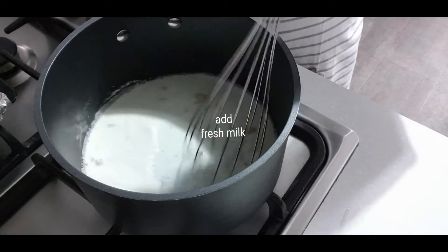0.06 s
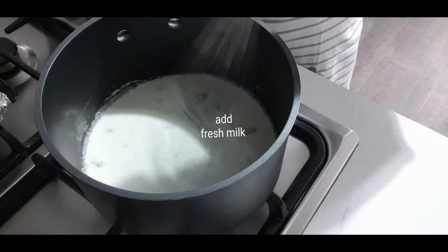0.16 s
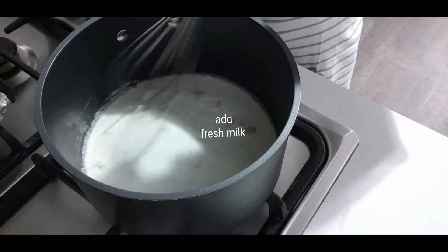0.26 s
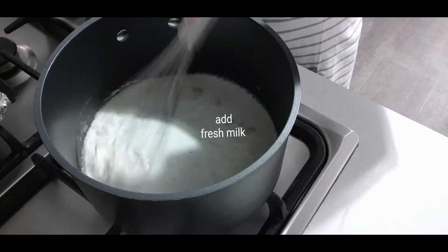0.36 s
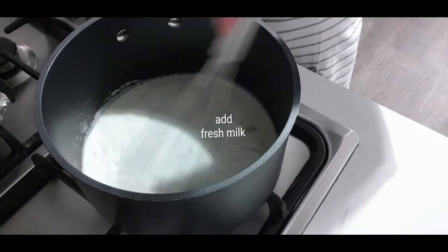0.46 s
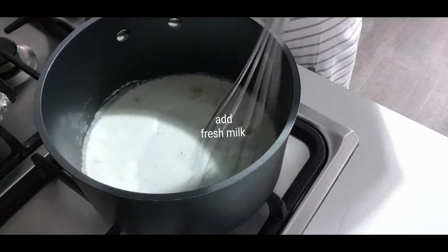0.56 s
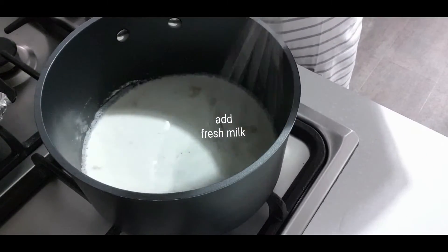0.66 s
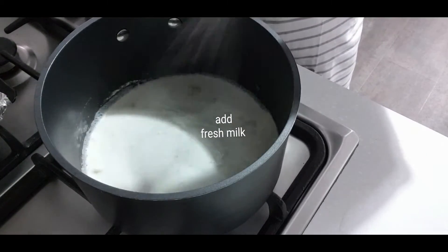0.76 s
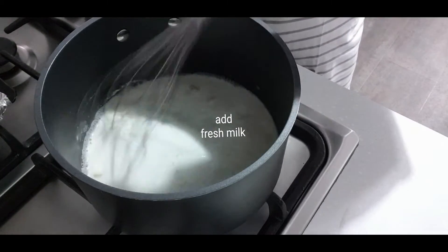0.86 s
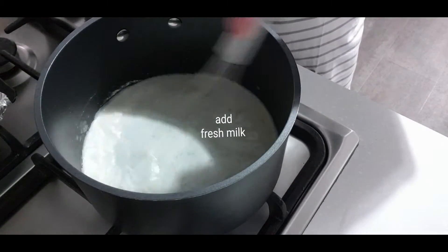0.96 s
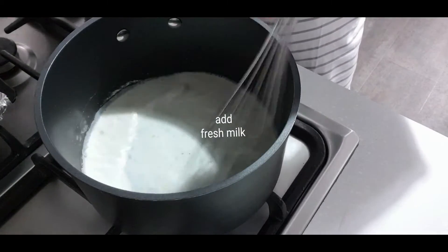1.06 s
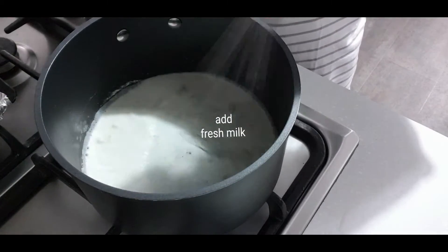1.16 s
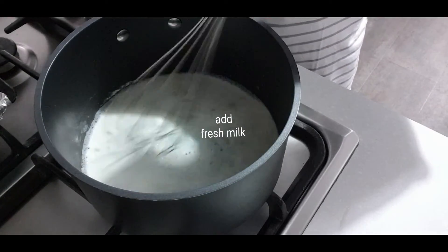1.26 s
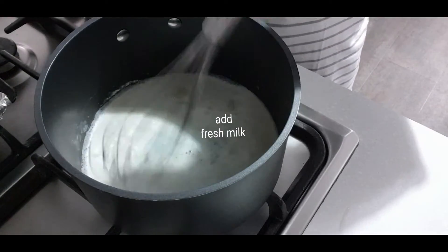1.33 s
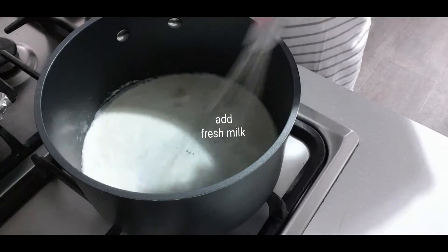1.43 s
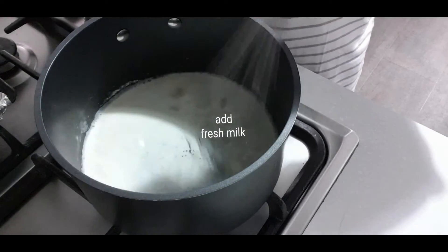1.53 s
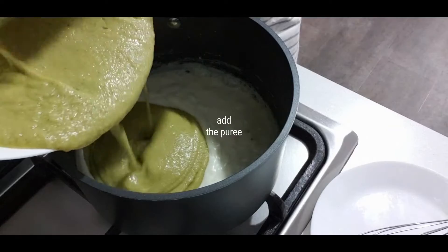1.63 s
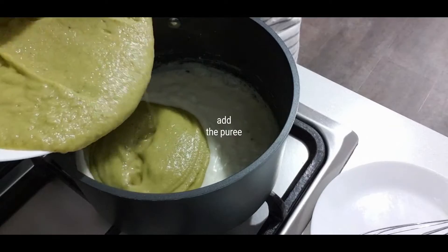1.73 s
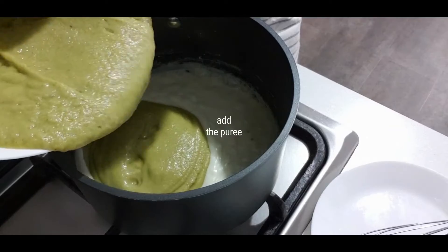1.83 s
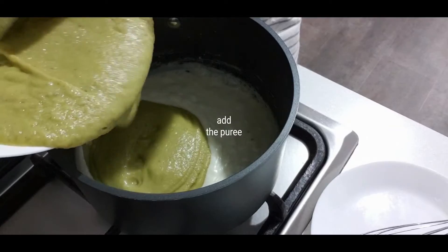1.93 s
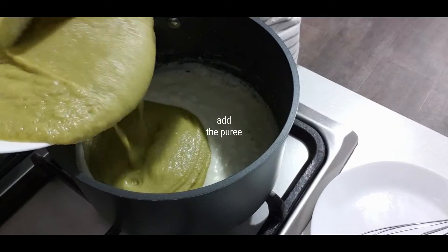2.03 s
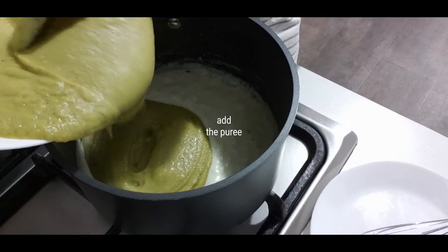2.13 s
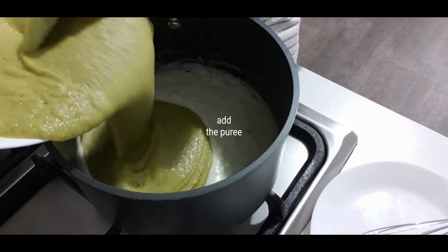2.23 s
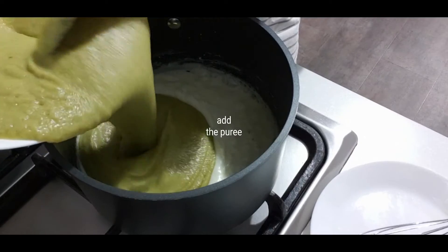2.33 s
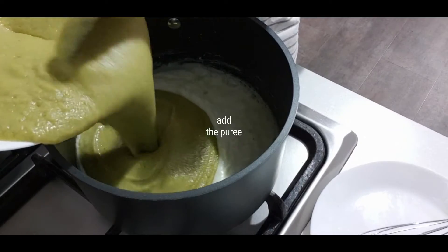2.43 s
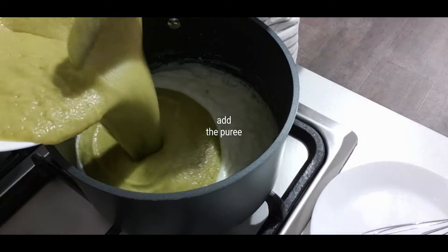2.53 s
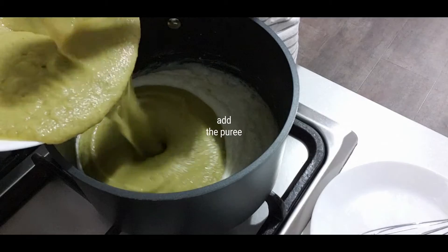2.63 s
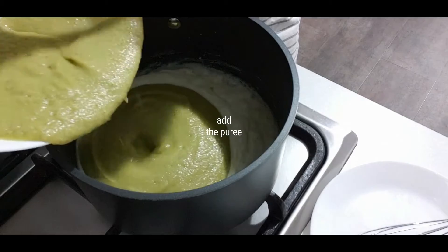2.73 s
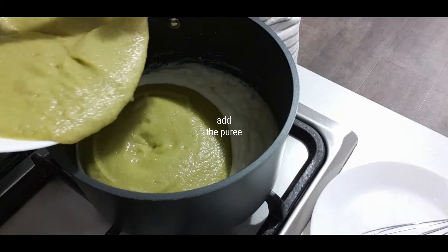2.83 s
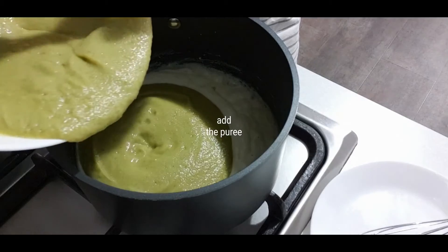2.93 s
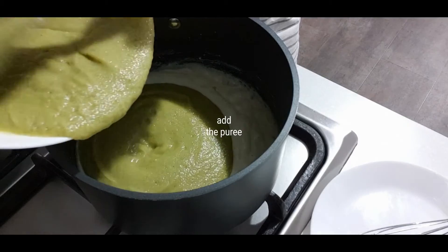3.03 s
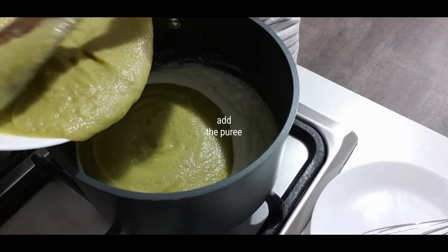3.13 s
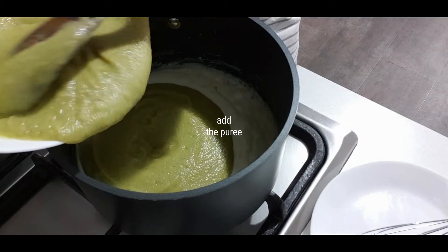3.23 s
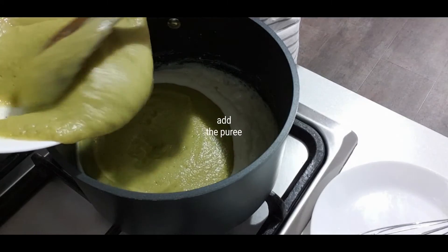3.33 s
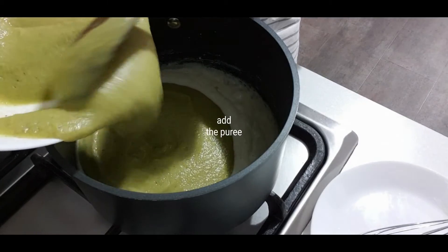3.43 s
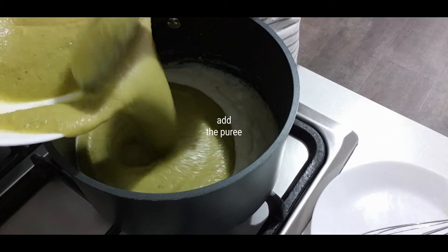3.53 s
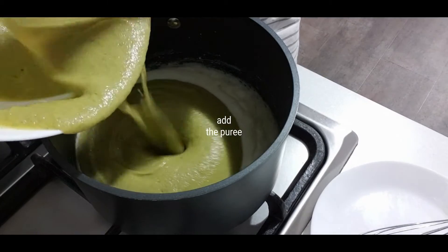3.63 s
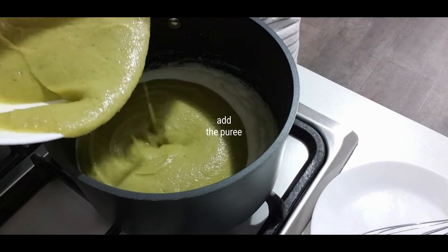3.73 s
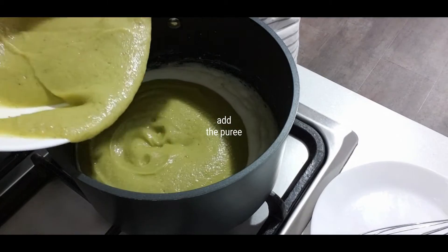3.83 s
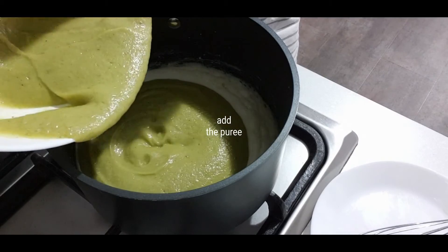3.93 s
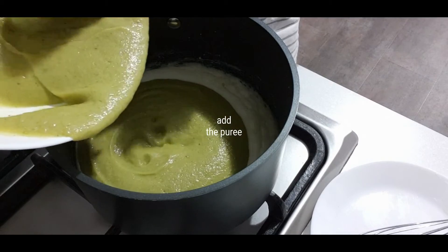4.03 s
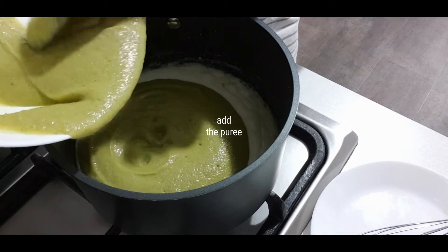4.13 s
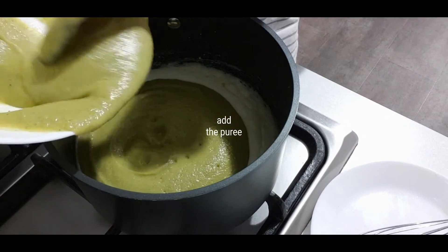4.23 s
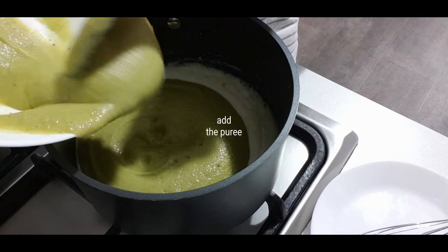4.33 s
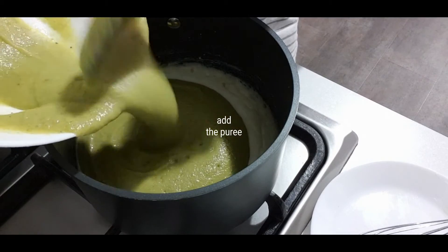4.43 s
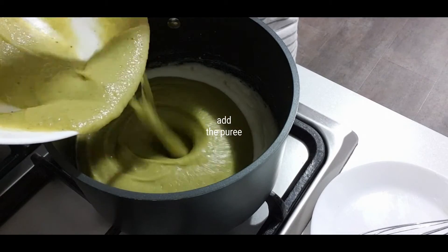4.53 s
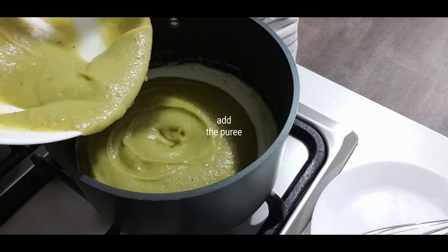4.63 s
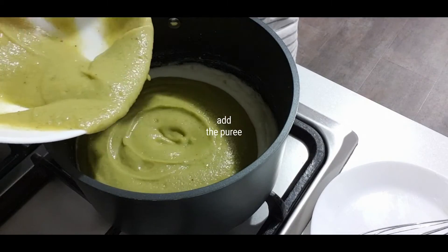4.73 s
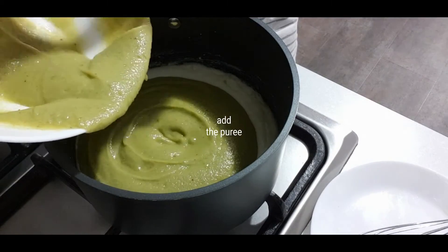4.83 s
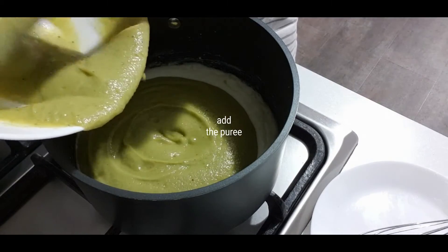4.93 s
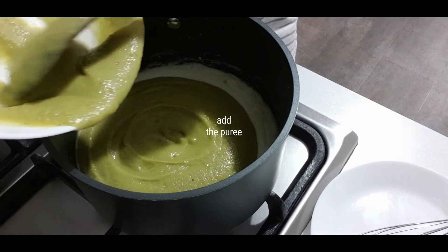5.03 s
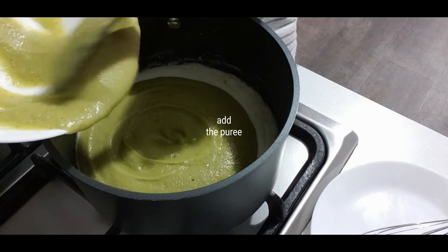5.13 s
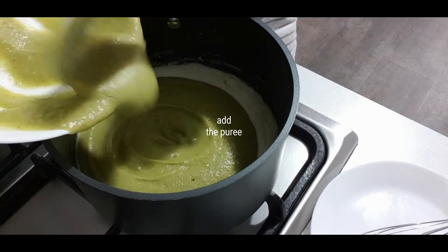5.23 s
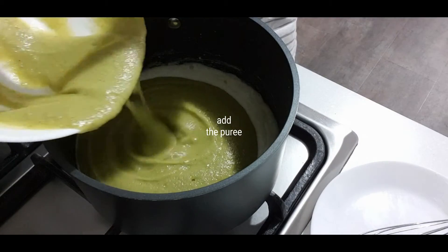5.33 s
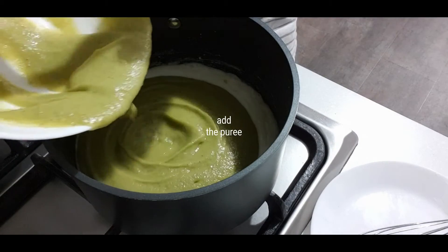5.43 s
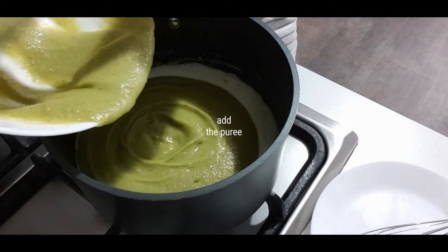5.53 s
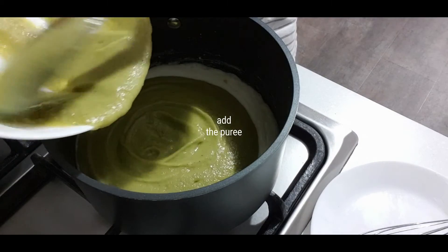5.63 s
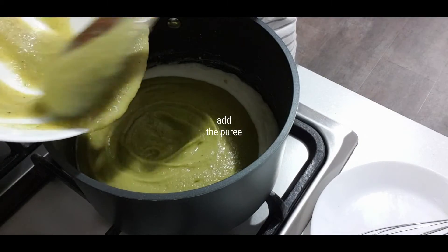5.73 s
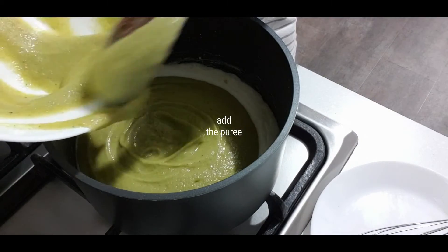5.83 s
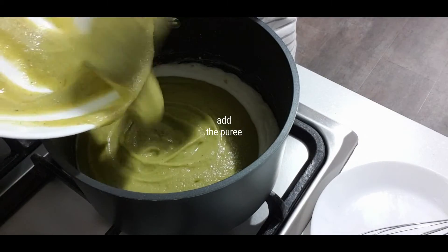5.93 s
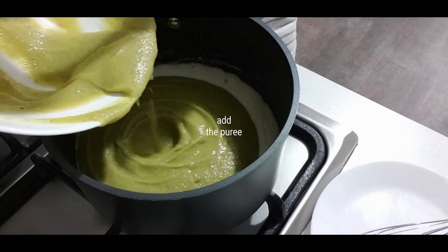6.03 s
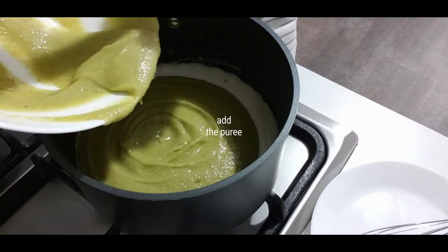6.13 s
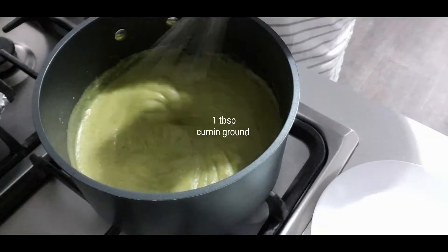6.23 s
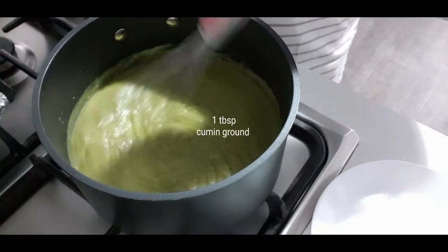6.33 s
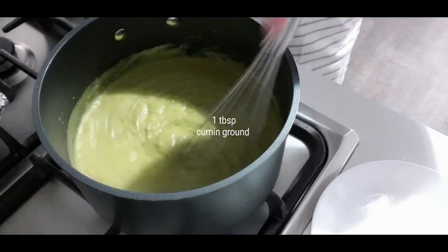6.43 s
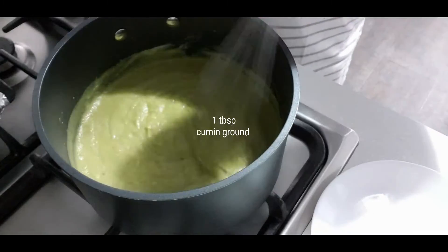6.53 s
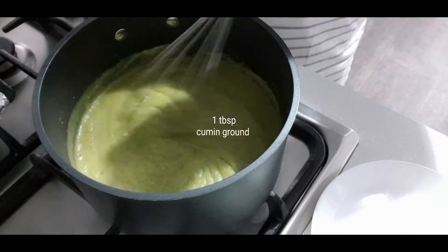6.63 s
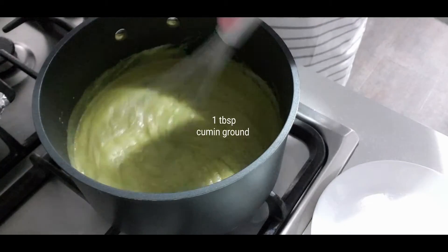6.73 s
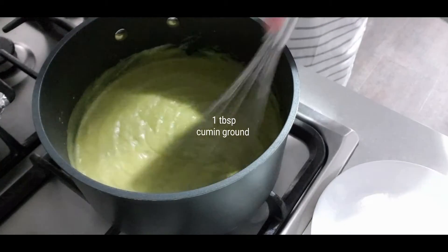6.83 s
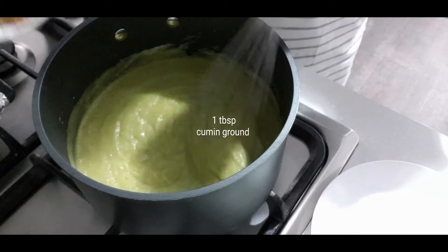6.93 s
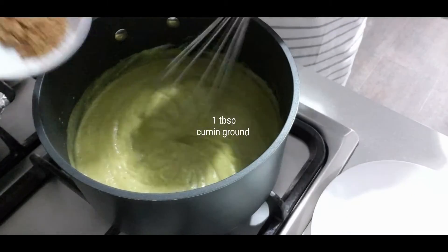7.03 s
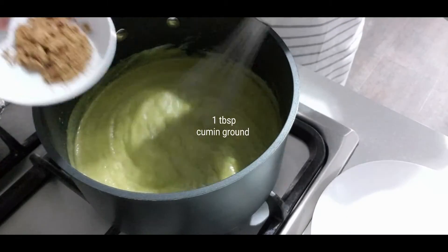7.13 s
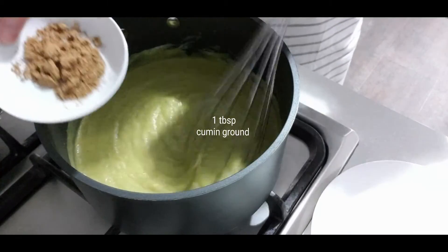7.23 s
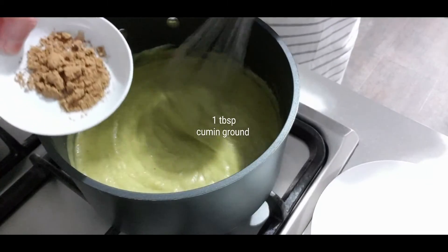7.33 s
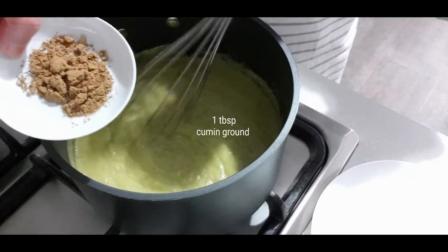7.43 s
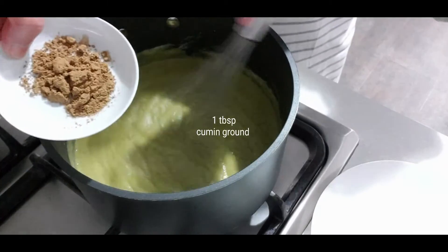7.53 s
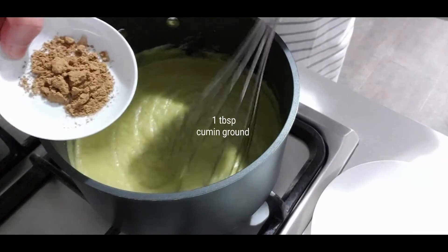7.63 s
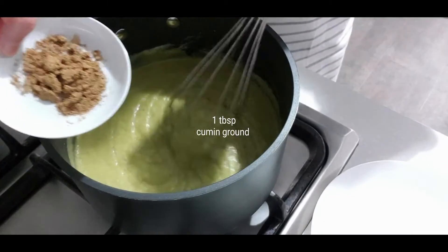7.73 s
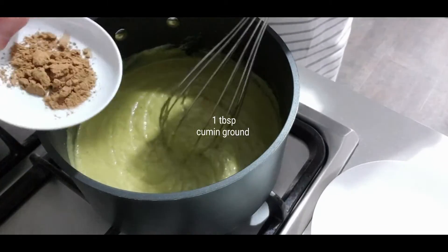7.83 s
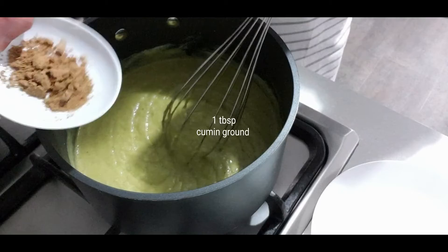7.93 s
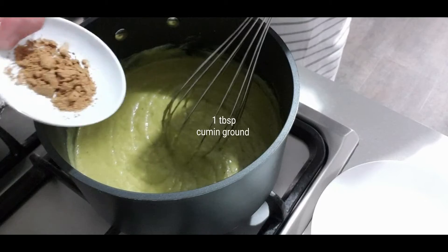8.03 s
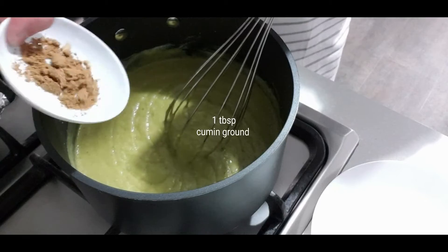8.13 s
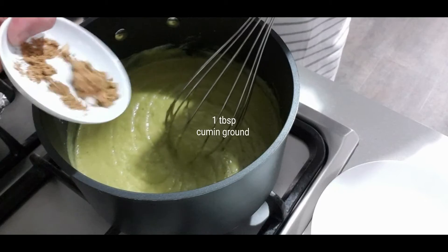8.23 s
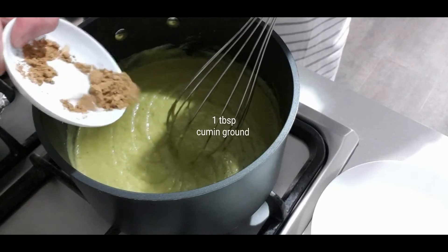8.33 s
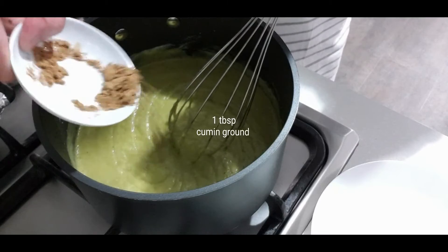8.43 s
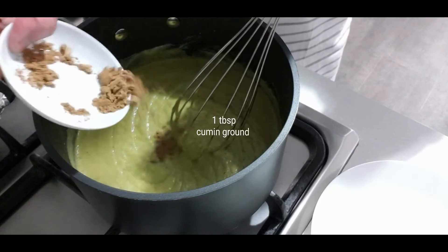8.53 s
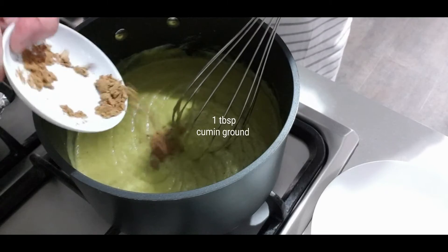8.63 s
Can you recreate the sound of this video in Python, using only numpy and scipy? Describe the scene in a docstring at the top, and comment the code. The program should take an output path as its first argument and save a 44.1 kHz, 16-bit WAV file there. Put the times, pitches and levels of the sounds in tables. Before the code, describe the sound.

Quick bright metallic whisk strokes ring a saucepan over hot milk sizzle and soft stove rumble, ending suddenly. In the quieter stretch, thick puree lands in soft hollow thuds, a spatula ticks and smacks wetly, and a bowl clunks against the pan rim. Then slower, damped whisk scrapes through heavy soup weaken and stop, leaving near silence. Close stereo pickup, short dry kitchen echo.

```python
"""Whisk, pan and puree bowl

A wire whisk scrapes a saucepan on a gas hob, first in sizzling milk, later in thick soup: noise in tiny slips
through shifting pan modes. Between, a spatula empties a bowl of puree: smacks and ticks are filtered noise
bursts, taps a short hum; plops into the pan and knocks of the bowl on the rim are decaying modes with a thump.
The hob rumbles and the pan simmers and hisses, all as shaped noise. Two spaced microphones, small kitchen."""
import sys
import numpy as np
from scipy import signal
from scipy.fft import rfft, irfft, next_fast_len
from scipy.io import wavfile
from scipy.ndimage import uniform_filter1d, map_coordinates

SR = 44100
rng = np.random.default_rng(int(sys.argv[2]) if len(sys.argv) > 2 else 0)


def to_wav(s):
    """Save 16-bit WAV."""
    ch = np.atleast_2d(s).T  # columns
    pcm = np.round(np.clip(ch, -1, 1) * 32767)  # PCM
    wavfile.write(sys.argv[1], SR, pcm.astype(np.int16))


N = 382788  # samples

# whisk strokes, milk then soup: start t/s, length/s, scrape level/dB, favoured mode f/Hz
STROKES = [(0, .13, -46.5, 1040), (0.108, 0.15, -28.5, 2300), (0.213, 0.069, -41, 2300),
           (0.265, 0.072, -28.5, 2870), (0.349, 0.16, -32, 2870), (0.504, 0.069, -35.5, 4500),
           (0.713, 0.22, -36, 1500), (0.859, 0.048, -26.5, 7900), (0.993, 0.048, -39.5, 4500),
           (1.041, 0.069, -63.5, 1040), (1.153, 0.15, -49.5, 2300), (1.353, 0.37, -39, 3920),
           (5.987, .19, -41, 1320), (6.17, 0.19, -34.5, 2560), (6.377, .16, -42, 1320),
           (6.564, 0.18, -41, 2560), (6.782, 0.15, -47, 2300), (6.96, .15, -45, 1320),
           (7.126, 0.087, -55, 2870), (7.214, 0.057, -56.5, 2300), (7.32, .18, -45.5, 1040),
           (7.526, 0.083, -60, 1320)]
# wires strike the wall: t/s, relative level/dB
WIRE_HITS = [(0.1151, -19.5), (0.7205, -9.5), (6.295, -14), (7.1223, -21), (7.221, -25)]
# colour of wire on metal: f/Hz, relative density level/dB
SCRAPE_COLOUR = [(350, -23), (620, -13), (1300, -12), (2200, -7), (4500, -3.5), (14400, -11)]
# pan modes rubbed by the wires: f/Hz, nominal width/Hz, relative level/dB
PAN_MODES = [(802, 37, -13.5), (1025.7, 14, -3.5), (1311.6, 25, 1.5), (1551, 36, -5), (2311, 29, 4),
             (2516, 12, -3), (2853, 23, -3.5), (3520, 15, -8), (4480, 40, 1), (4890, 60, -1.5),
             (5565, 50, -2), (7055, 210, -7.5), (7800, 350, -7), (10170, 40, -3.5)]
# milk sizzle on the hot bottom: f/Hz, relative density level/dB
SIZZLE_COLOUR = [(150, -42), (250, -18), (1060, -14.5), (1510, -16.5), (14500, -9.5)]
# bowl against the rim: t/s, body level/dB, hob thump re body level/dB
KNOCKS = [(3.7295, -18.5, -27), (3.7505, -8.5, -7), (3.94, -37, -11), (5.031, -15.5, -6)]
# short-lived rim modes: f/Hz, mean relative level/dB, t60/s
RIM = [(481, -14.5, 0.13), (621, -1.5, 0.11), (654, -2.5, 0.08), (764, -7, 0.076), (1065, -17, 0.028),
       (1272, -8, 0.053), (1829, -21.5, 0.13), (2330, -24.5, 0.18)]
# all rim modes, with the one long, thin ring: same columns
RIM_MODES = RIM + [(1612, -25.5, .7)]
# puree lands in the pan: t/s, body level/dB, hob thump re body level/dB, hollow f/Hz
PLOPS = [(1.605, -18.5, -18, 768), (2.711, -12, -18.5, 794), (4.421, -48.5, 8.5, 736),
         (4.546, -18, -29.5, 750), (5.334, -29, -30, 777), (5.39, -29.5, -24, 770), (7.137, -33.5, -5, 740),
         (7.23, -28.5, -6, 703), (7.262, -37, -13, 730)]
# pan bottom modes: f/Hz, mean relative level/dB, t60/s
BOTTOM_MODES = [(206, -14, 0.2), (358.7, -13, 0.18), (513.7, -5.5, 0.096), (996, -13, 0.099),
                (1280, -10.5, 0.046), (1580, -19.5, 0.077), (1690, -11, 0.07)]
# sticky puree tears off spatula and bowl: t/s, relative level/dB, centre f/Hz
SMACKS = [(1.9073, -29, 11240), (2.09, -48.5, 6890), (2.181, -63, 9000), (2.1923, -28, 9300),
          (2.229, -55, 11000), (2.305, -40, 8300), (2.3392, -41, 12000), (2.3838, -34, 11900),
          (2.419, -37, 6000), (2.4375, -32, 9000), (2.531, -42, 9000), (2.538, -37, 12000),
          (3.334, -37, 12500), (3.554, -42.5, 13300), (3.5715, -32.5, 6160), (4.314, -35.5, 11700),
          (4.4523, -40.5, 8200), (4.5404, -29.5, 13670), (5.1864, -38, 7950), (5.8586, -33, 12100),
          (5.89, -35.5, 5360), (5.9303, -41, 11000)]
# spatula touches the bowl: t/s, peak level/dB
TAPS = [(2.34, -43.5), (2.418, -37.5), (2.44, -41.5), (2.942, -54.5), (2.99, -59), (3.334, -49),
        (4.314, -50), (5.175, -44.5), (5.858, -42), (5.93, -46)]
# pan shoved on its grate: t/s (rise complete), relative level/dB, hold/s
SHOVES = [(0, -45, 0.26), (0.512, -53, 0.023), (0.735, -38.5, 0.027), (0.99, -51, 0.18),
          (1.474, -54, 0.096), (2.134, -53, 0.0093), (2.62, -48, 0.094), (2.992, -47.5, .02),
          (3.098, -54, 0.044), (3.75, -44.5, 0.024), (5.056, -49, 0.029), (6.138, -49.5, 0.014),
          (7.142, -47, 0.11)]
# grate rumble resonances: f/Hz, width/Hz, relative level/dB
GRATE_MODES = [(125.4, 22.4, 8.5), (221.3, 60, -13.5), (486.2, 300, -24), (645, 27, -20.5)]
# deep stove resonances: f/Hz, width/Hz, relative level/dB
DEEP_MODES = [(43.8, 8.3, 0), (75.9, 51, -3)]
# simmer resonances of the pan: f/Hz, width/Hz, relative level/dB
SIMMER_MODES = [(630, 90, -3.5), (1258, 33, 3.5)]
# fine hiss: f/Hz, relative density level/dB
HISS_COLOUR = [(350, -47.5), (600, -15), (837, -7), (1170, -23), (1910, -18.5), (2160, -13), (7160, -23),
               (14500, -18)]
# kitchen walls: f/Hz, t60/s
WALLS = [(300, 0.28), (2000, 0.21), (10000, 0.16)]

MILK_END_S = 1.4336  # whisking and sizzle break off at once
RING_DB_PER_DB, LIGHT_DB = 0.24, -40  # low ring grows slower than the scrape, reckoned from this scrape level
THUMP_HZ, THUMP_T60_S = 128.2, 0.24  # the pan support bounces
HOLLOW_T60_S = 0.072  # air over the food, pitch set by where the lump lands
SPREAD_S, SPREAD_DB = 0.096, 6  # smack crowding: reach in time, hiss lift per unit
TICKS_PER_S, TICK_DB, TICK_SCATTER_DB = 42, -57, 6  # rate per unit of crowding
SHOVE_RISE_S, SHOVE_FALL_DB_PER_S, HOB_REST_DB = 0.016, 89.5, -66
SIMMER_DB, SIMMER_DROP_DB, SIMMER_END_S = -70, 20, 7.7  # dies down once stirring stops
HISS_DB = -72
ROLL_HZ, TOP_HZ = 14550, 15579


def stroke_ends(rub, stroke, luck, ring_db, damp_db, favour_db, widen):
    """High and low bands of the rubbed pan at both ends of a stroke; modes shift as wires travel and food sloshes."""
    hz, width_hz, level_db = np.transpose(PAN_MODES)
    level_db = level_db + damp_db * np.log2(hz / 2000)  # the contents tilt the modes, dB/octave
    level_db = level_db + favour_db * (np.abs(hz / stroke[3] - 1) < 0.06)
    ends = []
    for shift, strength in luck:
        pan = modes(np.transpose([hz * (1 + 0.012 * shift), width_hz * widen, level_db + 2.51 * strength]))

        def bands(f):
            colour = amp(along(SCRAPE_COLOUR, f)) + amp(ring_db) * np.abs(pan(f))
            upper = 1 / (1 + (3000 / (f + 1)) ** 8)  # split at 3 kHz
            return colour * np.array([upper, 1 - upper])

        ends.append(unit(filtered(rub, bands).T).T)
    return ends


def whisk(strokes, low_db, ring_db, damp_db, grit_db, patchy_db, skew, soft, hit_t60_s, favour_db, widen):
    """Wires skip over the metal in tiny slips; each stroke presses, lets go and rings the modes its own way."""
    grit = amp(grit_db * np.tile(wobble(400), 2)[:N + SR])
    slips = patchy(rng.standard_normal(N + SR) * grit, patchy_db)
    out, t = np.zeros(N + SR), np.arange(SR // 2) / SR
    lucks = rng.standard_normal((len(strokes), 2, 2, len(PAN_MODES)))
    for stroke, luck in zip(strokes, lucks):
        start_s, length_s, scrape_db, _ = stroke
        rub = slips[round(start_s * SR):][:len(t)]
        first, last = stroke_ends(rub, stroke, luck, ring_db, damp_db, favour_db, widen)
        travel = np.clip(t / length_s, 0, 1)
        turn = np.pi / 2 * travel
        high, low = first * np.cos(turn) ** 2 + last * np.sin(turn) ** 2
        pressure = np.abs(np.sin(np.pi * travel ** skew)) ** soft * (t < length_s)
        scrape = amp(scrape_db) * pressure
        # square root: the low ring swells earlier and lingers longer within the stroke
        ring = amp(low_db + RING_DB_PER_DB * (scrape_db - LIGHT_DB)) * np.sqrt(pressure)
        for hit_s, hit_db in WIRE_HITS:
            if -0.015 < hit_s - start_s < length_s - 0.015:
                since_s = t + start_s - hit_s
                decay = amp(hit_db - 6.5 - 60 * np.abs(since_s) / hit_t60_s)
                hit = np.clip(since_s / 0.003, 0, 1) * decay
                scrape, ring = scrape + hit, ring + amp(-18) * hit
        out[round(start_s * SR):][:len(t)] += scrape * high + ring * low
    return out[:N]


def milk():
    """Whisking over the sizzle of thin milk on the hot bottom; sloshing excites the lower modes in patches."""
    strokes = [row for row in STROKES if row[0] < MILK_END_S]
    wires = whisk(strokes, low_db=-45.0, ring_db=6, damp_db=0.56, grit_db=2.5, patchy_db=3.5, skew=0.55,
                  soft=1.2, hit_t60_s=0.069, favour_db=10.5, widen=0.73)
    sizzle = amp(-39.0 + wobble(30)) * noise(lambda f: amp(along(SIZZLE_COLOUR, f)), alike=0.043)
    slosh_modes = modes(PAN_MODES + [(430, 250, -2)])
    patches = patchy(rng.standard_normal(N), db=11)[:N]
    slosh = unit(filtered(patches, lambda f: slosh_modes(f) / (1 + (f / 3000) ** 4)))
    near = place(wires + amp(-48) * slosh, lag_s=0.00024, pan_db=-4.0, wet_db=1.0)
    after_s = np.maximum(np.arange(N) / SR - MILK_END_S, 0)
    # 16 dB drop at the end, then a short decay
    return (near + sizzle) * np.where(after_s > 0, amp(-16.0 - 60 * after_s / 0.18), 1)


def soup():
    """Thick soup damps the upper pan modes under the whisk."""
    strokes = [row for row in STROKES if row[0] > MILK_END_S]
    wires = whisk(strokes, low_db=-42.5, ring_db=9.5, damp_db=-6.5, grit_db=1.5, patchy_db=4.5, skew=0.89,
                  soft=1.63, hit_t60_s=0.035, favour_db=6.5, widen=1.22)
    return place(wires, lag_s=0.0001, pan_db=-7.5, wet_db=3.5)


def blows(events, table, contact_db, contact_s, blur, rise_s):
    """Each blow rings the modes at new strengths, loud while contact lasts, and thumps the pan support."""
    out, t = np.zeros(N + SR), np.arange(SR // 2) / SR

    def slap_band(f):
        high_pass = (1j * f / 500) ** 2 / (1 + 1j * f / 500) ** 2
        return high_pass / (1 + 1j * f / 1300) ** 2 / (1 + 1j * f / 5000) ** 3

    crack_mode = modes([(3000, 2200, 0)])
    for s, db, thump_db, *hollow in events:
        rings = table + [(hz, 0, HOLLOW_T60_S) for hz in hollow]
        # lossy modes wander in phase; the faster they die the more
        drift = np.cumsum(rng.standard_normal((len(rings), len(t))), axis=1) * blur
        ring = np.zeros(len(t))
        for k, (hz, level_db, t60_s) in enumerate(rings):
            decay = amp(level_db + 2 * rng.standard_normal() - 60 * t / t60_s)
            ring += (-1) ** k * decay * np.sin(2 * np.pi * hz * t + drift[k] / min(t60_s, 0.25))
        ring = ring * (1 + amp(contact_db) * np.exp(-(t / contact_s) ** 4))
        slap = filtered(rng.standard_normal(len(t)) * amp(-60 * t / 0.079), slap_band)
        crack = filtered(rng.standard_normal(len(t)) * amp(-60 * t / 0.07), lambda f: crack_mode(f) ** 3)
        body = ring / np.abs(ring).max() + amp(2.0) * slap + amp(-19.5) * crack
        thump = amp(thump_db - 60 * t / THUMP_T60_S) * np.sin(2 * np.pi * THUMP_HZ * t)
        thump = thump * (1 - np.exp(-(t / 0.0082) ** 2))
        out[round(s * SR):][:len(t)] += amp(db) * (body * (1 - np.exp(-t / rise_s)) + thump)
    return out[:N]


def knocks():
    """The bowl strikes the rim: hard, fast onset and ringing rim modes."""
    return blows(KNOCKS, RIM_MODES, contact_db=1.5, contact_s=0.014, blur=0.0021, rise_s=0.0005)


def plops():
    """Puree lumps strike the pan bottom: softer onset, blurred modes and a hollow air pitch."""
    return blows(PLOPS, BOTTOM_MODES, contact_db=5.5, contact_s=0.009, blur=0.0037, rise_s=0.0016)


def smacks():
    """Sticky puree tears: a crisp snap and a short wet fizz around its centre."""
    out, t = np.zeros(N + SR), np.arange(SR // 4) / SR
    for s, db, hz in SMACKS:
        burst = rng.standard_normal(len(t)) * (amp(-60 * t / 0.0084) + amp(-15 - 60 * t / 0.05))
        centre = modes([(hz, 2500, 0)])
        fizz = filtered(burst, lambda f: (amp(-3.0) + centre(f)) * high_pass3(f, 4500))
        out[round(s * SR):][:len(t)] += amp(db + 2.5) * fizz
    return out[:N]


def ticks():
    """Small irregular threads of puree snap where the smacks crowd."""
    chance, size = rng.random((2, N))
    snaps = (chance < TICKS_PER_S * crowding() / SR) * amp(TICK_DB - TICK_SCATTER_DB * np.log(size + 1e-3))
    decay = np.exp(-1 / (0.0005 * SR))  # 0.5 ms
    grain = signal.lfilter([1], [1, -decay], snaps) * rng.standard_normal(N)
    return filtered(grain, lambda f: high_pass3(f, 5000))


def crowding():
    """Smooth density of smacks in excess of 0.8."""
    return slow(lambda t: np.maximum(sum(np.exp(-((t - s) / SPREAD_S) ** 2) for s, _, _ in SMACKS) - 0.8, 0))


def taps():
    """The loaded bowl hums briefly under the spatula: a noise burst through one damped mode."""
    out, t = np.zeros(N + SR), np.arange(SR // 4) / SR
    for s, db in TAPS:
        bowl = filtered(rng.standard_normal(len(t)) * amp(-60 * t / 0.03), modes([(640, 40, 0)]))
        out[round(s * SR):][:len(t)] += amp(db) * bowl / np.abs(bowl).max()
    return out[:N]


def shove_level(t):
    """Each shove rises fast, holds, then falls at a constant dB rate."""
    total = 0
    for s, db, hold_s in SHOVES:
        fall_db = SHOVE_FALL_DB_PER_S * np.maximum(t - s - hold_s, 0)
        total = total + np.clip((t - s) / SHOVE_RISE_S + 1, 0, 1) * amp(db - fall_db)
    return total


def hob():
    """Shoves shake the grate in lumps over a deep rumble, almost the same on both sides."""
    shake = amp(HOB_REST_DB) + slow(shove_level)
    grate_modes, deep_modes = modes(GRATE_MODES), modes(DEEP_MODES)
    grate = unit(amp(3 * wobble(16))) * noise(lambda f: grate_modes(f) * (f < 800), alike=0.91)
    deep_noise = noise(lambda f: deep_modes(f) * (f > 28) / (1 + (f / 110) ** 4), alike=0.97)
    deep = unit(amp(2.5 * wobble(16))) * deep_noise
    # the heavy stove keeps swaying after each shove, 0.12 s time constant
    step = 1 / (0.12 * SR)
    sway = signal.lfilter([step], [1, step - 1], shake)
    return (amp(9.5) * shake ** 1.149 * grate + amp(0.5) * sway * deep) * amp([[-0.7], [0.7]])


def kitchen():
    """The pan simmers in its own resonances under a fine hiss that crackles when puree is moved."""
    t = np.arange(N) / SR
    calm = np.clip((t - SIMMER_END_S) / 0.13 + 0.5, 0, 1)
    simmer_modes = modes(SIMMER_MODES)
    bubbling = noise(lambda f: amp(-17.5) * (f > 300) * (f < 2600) + simmer_modes(f), alike=0.085)
    simmer = amp(SIMMER_DB - SIMMER_DROP_DB * calm) * amp(1.6 * wobble(9.4)) * bubbling
    hiss = amp(HISS_DB + 0.8 * wobble(70)) * noise(lambda f: amp(along(HISS_COLOUR, f)), alike=0.01)
    treble = filtered(hiss, lambda f: f > 4000)
    hiss = hiss - 0.43 * calm * treble  # the finest fizz fades with the simmer
    crackle = (amp(SPREAD_DB * crowding()) - 1) * amp(5 * wobble(150)) * hiss
    return simmer + hiss + filtered(crackle, lambda f: 1 / (1 + (3500 / (f + 1)) ** 4))


def place(x, lag_s, pan_db, wet_db):
    """Sound reaches the left microphone later; each side hears its own wall echoes."""
    sides = np.array([[1], [-1]])
    pair = filtered(x, lambda f: np.exp(-1j * np.pi * f * lag_s * sides)) * amp(pan_db / 2 * sides)
    hz, t, z = signal.stft(rng.standard_normal((2, SR // 2)), SR, nperseg=256)
    tail = signal.istft(z * amp(-60 * t / along(WALLS, hz)[:, None]), SR, nperseg=256)[1]
    tail = filtered(tail, lambda f: 1 / (1 + (350 / (f + 1)) ** 4))  # no lows in the separate echoes
    tail = np.pad(tail / np.linalg.norm(tail[0]), ((0, 0), (150, 0)))  # echoes start 150 samples late
    return pair + amp(wet_db) * signal.fftconvolve(x[None], tail, axes=1)[:, :N]


def noise(response, alike):
    """Stereo noise of rms 1; alike sets the correlation of the sides."""
    shares = np.sqrt(np.clip([[1 + alike], [1 - alike]], 0, 2))
    mid, side = filtered(rng.standard_normal((2, N)), response) * shares
    return unit(np.array([mid + side, mid - side]).T).T


def patchy(x, db):
    """x with random gain patches about 300 Hz by 40 ms."""
    z = signal.stft(x, nperseg=512)[2]
    field = uniform_filter1d(rng.standard_normal(z.shape), size=4, axis=0)
    field = uniform_filter1d(field, size=7, axis=1)
    return signal.istft(z * amp(db * field / field.std()), nperseg=512)[1]


def modes(table):
    """Causal response of (f/Hz, width/Hz, level/dB) resonances, alternating in sign."""
    def response(f):
        return sum((-1) ** k * amp(db) * 1j * f * width / (hz * hz - f * f + 1j * f * width)
                   for k, (hz, width, db) in enumerate(table))
    return response


def high_pass3(f, corner_hz):
    """Third-order high-pass response."""
    return (1j * f / corner_hz / (1 + 1j * f / corner_hz)) ** 3


def filtered(x, response):
    """x times a complex response of frequency."""
    m = next_fast_len(x.shape[-1] + 8192)
    return irfft(rfft(x, m) * response(np.fft.rfftfreq(m, 1 / SR)), m)[..., :x.shape[-1]]


def wobble(rate_hz):
    """A smooth random curve, rate_hz knots a second."""
    return map_coordinates(rng.standard_normal(int(N * rate_hz / SR) + 4), [np.arange(N) * rate_hz / SR])


def slow(shape):
    """A slow function of time, evaluated every 64 samples and interpolated."""
    t = np.arange(0, N + 64, 64) / SR
    return np.interp(np.arange(N) / SR, t, shape(t))


def along(points, hz):
    """(f/Hz, value) points interpolated on a log frequency axis."""
    f, v = np.transpose(points)
    return np.interp(np.log(hz + 1), np.log(f + 1), v)


def unit(x):
    """Each column scaled to rms 1."""
    return x / np.sqrt(np.mean(x ** 2, axis=0) + 1e-20)


def amp(db):
    """Decibels to gain."""
    return 10 ** (np.asarray(db) / 20)


def scene():
    """Whisk, bowl and pan over the hob and the kitchen floor noise."""
    whisking = milk() + soup()
    struck = place(knocks() + plops(), lag_s=0.00014, pan_db=-2.0, wet_db=-8.5)
    puree = place(smacks() + taps() + ticks(), lag_s=0.0002, pan_db=-7.5, wet_db=-4)
    return whisking + struck + puree + hob() + kitchen()


def record(dry):
    """The treble falls steeply above the roll-off and ends at the band limit."""
    return filtered(dry, lambda hz: amp(-38 * np.clip((hz - ROLL_HZ) / 200, 0, 1)) * (hz < TOP_HZ))


dry = scene()
out = record(dry)
to_wav(out)
```